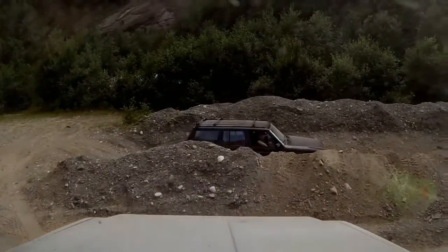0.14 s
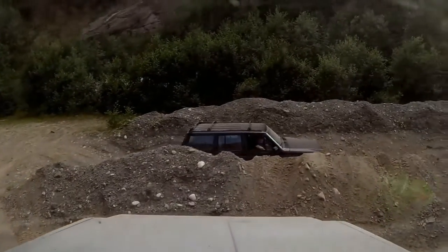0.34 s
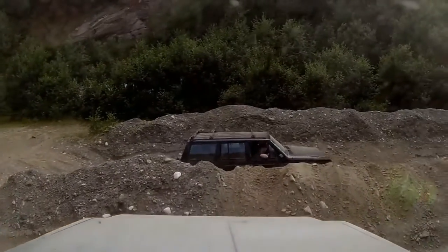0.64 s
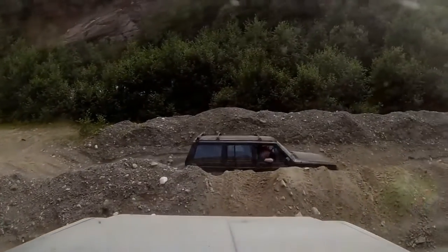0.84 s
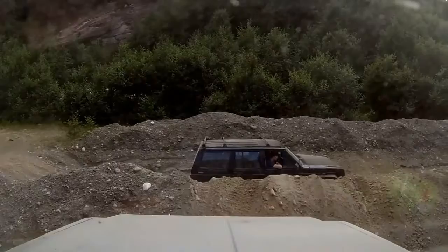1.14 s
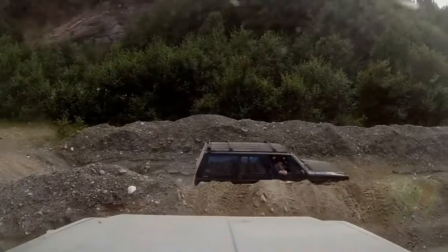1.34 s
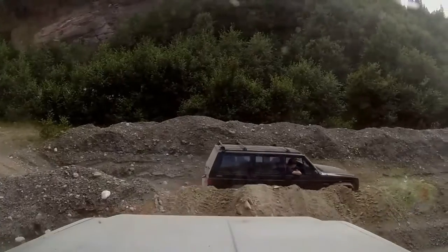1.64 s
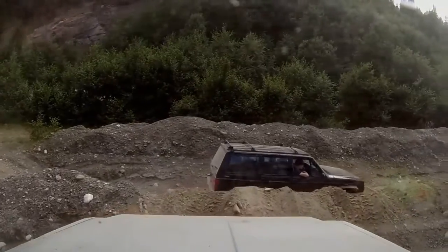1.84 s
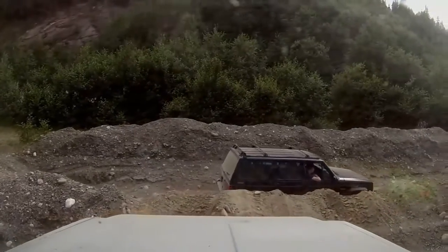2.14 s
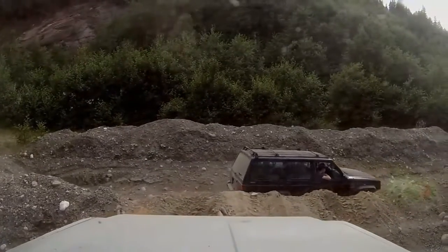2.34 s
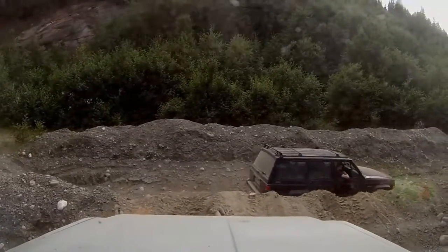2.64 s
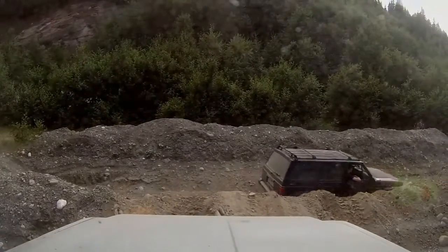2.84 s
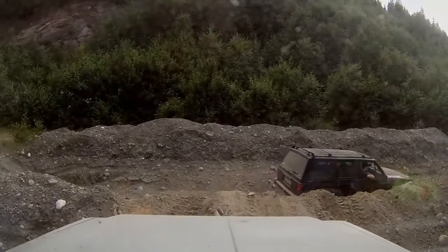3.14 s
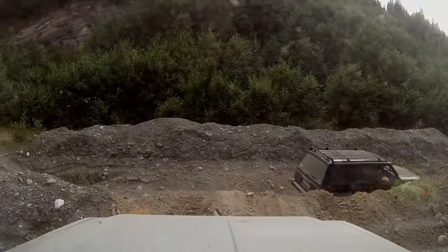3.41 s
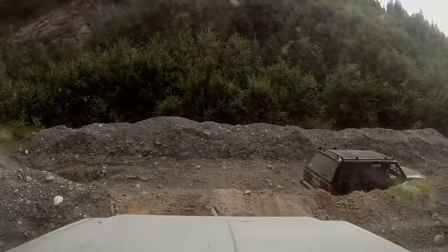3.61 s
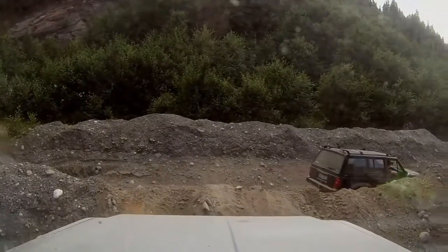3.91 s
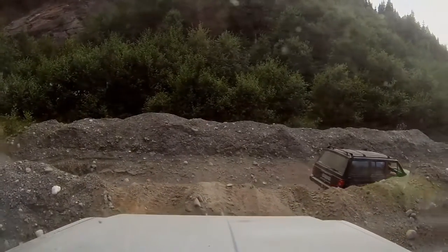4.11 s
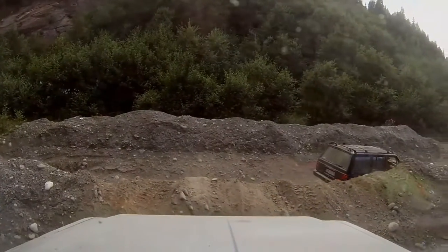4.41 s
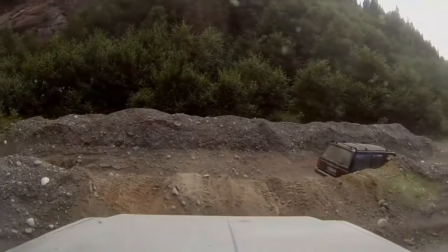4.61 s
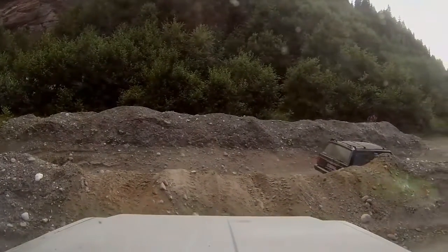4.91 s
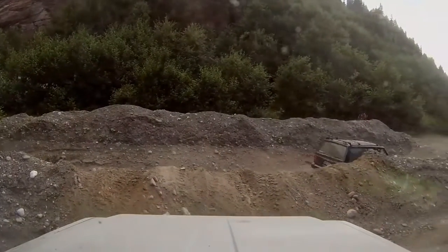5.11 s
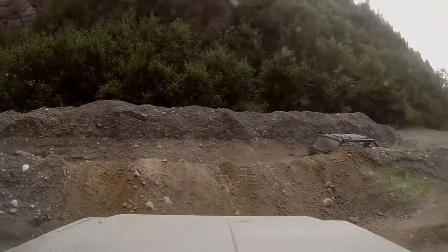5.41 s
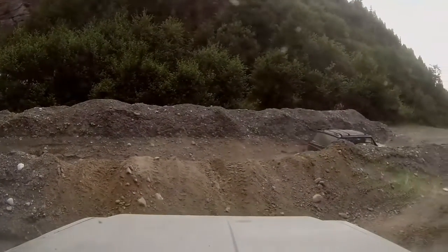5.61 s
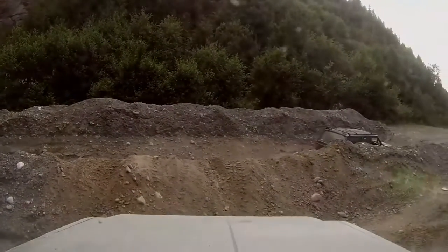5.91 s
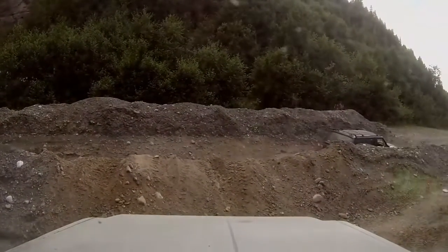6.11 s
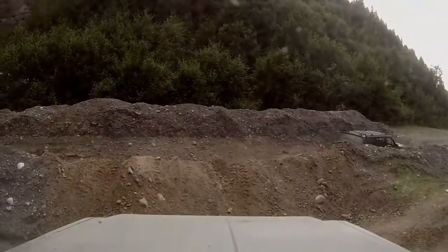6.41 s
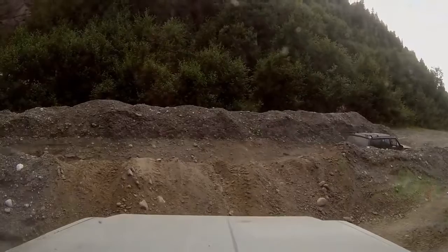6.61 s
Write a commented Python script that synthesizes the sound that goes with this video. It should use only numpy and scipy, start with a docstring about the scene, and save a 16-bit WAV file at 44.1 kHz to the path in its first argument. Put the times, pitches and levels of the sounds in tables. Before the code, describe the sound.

Inside an old four-wheel-drive crawling over gravel, a low engine booms and throbs while bumps set off knocks and metal rattles.

```python
"""Inside an old four-wheel-drive crawling over gravel, heard by a small camera in a closed housing.
The cabin booms on two low engine tones over road rumble. Bumps rattle a loose steel latch and knock
the camera mount, both echoing briefly; they also make joints squeak and drag something along the body.
The microphone hisses faintly, and the camera turns its gain down after loud peaks."""
import sys
import numpy as np
from scipy import signal
from scipy.fft import rfft, irfft, next_fast_len
from scipy.io import wavfile
from scipy.ndimage import uniform_filter1d, map_coordinates

SR = 44100
rng = np.random.default_rng(int(sys.argv[2]) if len(sys.argv) > 2 else 0)


def store_wav(level_fs):
    """Save 16-bit WAV to argv[1]."""
    pcm = np.round(np.clip(np.atleast_2d(level_fs), -1, 1) * 32767)
    wavfile.write(sys.argv[1], SR, pcm.T.astype(np.int16))


N = 297675

# Low and high resonances rung by both latch and mount: f/Hz, width/Hz, gain/dB
THUD_MODES = [(205, 232, 1), (418, 123, -9), (842, 82, -7.5), (1247, 130, -13.5)]
EDGE_MODES = [(4390, 216, -0.5), (6120, 550, -5), (7300, 1200, -26), (11500, 3000, -29)]


def amp(db):
    return 10 ** (np.asarray(db) / 20)


def unit(x):
    return x / np.sqrt(np.mean(x ** 2) + 1e-20)


def curves(rows):
    """Each column after the time, interpolated per sample."""
    times, *columns = np.transpose(rows)
    return [np.interp(np.arange(N) / SR, times, column) for column in columns]


def wobble(rate_hz):
    """Smooth random curve, rate_hz knots a second."""
    knots = rng.standard_normal(int(N * rate_hz / SR) + 4)
    return map_coordinates(knots, [np.arange(N) * rate_hz / SR])


def filtered(x, response):
    """x through a complex frequency response."""
    size = next_fast_len(N + SR // 2)
    return irfft(rfft(x, size) * response(np.fft.rfftfreq(size, 1 / SR)), size)[..., :N]


def rush(spectrum, flutter_db, rate_hz):
    """Fluttering coloured noise, rms 1."""
    hz, db = np.transpose(spectrum)
    noise = rng.standard_normal(N) * amp(flutter_db * wobble(rate_hz))
    return unit(filtered(noise, lambda f: amp(np.interp(np.log(f + 1), np.log(hz + 1), db))))


def resonances(f, modes, soft_hz):
    """Response of modes of alternating sign; the give of the contact cuts above soft_hz."""
    ring = sum((-1) ** k * amp(db) * 1j * f * width_hz / (hz * hz - f * f + 1j * f * width_hz)
               for k, (hz, width_hz, db) in enumerate(modes))
    return ring / (1 + 1j * f / soft_hz) ** 4


def struck(times, forces, modes, soft_hz, detune=.015, uneven_db=1.5):
    """Short forces, one row per blow, ring modes that shift slightly each time."""
    out, size = np.zeros(N + SR), 4096
    f = np.fft.rfftfreq(size, 1 / SR)
    hz, width_hz, db = np.transpose(modes)
    for start_s, force in zip(times, forces):
        shift, swing = rng.standard_normal((2, len(modes)))
        shifted = zip(hz * (1 + detune * shift), width_hz, db + uneven_db * swing)
        out[round(start_s * SR):][:size] += irfft(rfft(force, size) * resonances(f, shifted, soft_hz))
    return out[:N]


def wavering(hz, db, waver_hz=0.6, waver_db=1.1):
    """Phase and amplitude of an unsteady tone."""
    phase = 2 * np.pi * np.cumsum(hz + waver_hz * wobble(8.2)) / SR
    return phase, np.sqrt(2) * amp(db + waver_db * wobble(9))


def engine_boom(throb_hz=6.1, throb_ref_s=4.73):
    """Two engine tones with weak octaves boom in the cabin; the lower throbs. Gives sound and phases."""
    low_tone = [(0, 42.2, -28, 3), (.55, 43.1, -29, 5), (.75, 43.9, -31, 3), (.92, 43.5, -32, 10.5),
                (1.02, 43.37, -24, 0), (1.35, 44.8, -44.5, -9), (1.8, 45.27, -33.5, -11.5),
                (2.2, 46.72, -37, 16), (2.4, 43.57, -28.5, 2.5), (2.7, 41.76, -20.5, 0),
                (2.87, 44.3, -58, -4), (3.25, 49.74, -19, -1.5), (3.4, 46.9, -33, 10),
                (3.52, 44.9, -20, -2.5), (3.63, 50.4, -34, -8), (3.76, 51.06, -14, 0.5),
                (3.88, 48.4, -47, -6), (3.93, 48.94, -13.5, 5.5), (4.2, 50.55, -17, 2.5),
                (4.36, 50.4, -15, -2.5), (4.42, 47.9, -30, 6), (4.52, 51.56, -21, 2),
                (4.62, 48.34, -35, -12), (4.74, 52, -19, 7.5), (5.1, 51.06, -27.5, 0),
                (5.5, 49.43, -17, -4), (5.85, 49.32, -30, 9.5), (6.0, 42.95, -34.5, 4.5),
                (6.32, 44.55, -26.5, 7.5), (6.42, 46.57, -32, 2), (6.75, 41.1, -25.5, 1)]  # t/s, f/Hz, level/dB, signed throb depth/dB
    high_tone = [(0, 63.44, -33.5), (.44, 62.6, -25), (.68, 64.9, -31), (.82, 59.83, -34),
                 (.94, 62.88, -28), (1.44, 62.53, -30.5), (1.54, 63.2, -25.5), (2.27, 60.6, -27.5),
                 (2.63, 64.15, -37.5), (2.89, 62.8, -25.5), (3.0, 61, -31), (3.2, 61.99, -21.5),
                 (3.33, 60.9, -16.5), (3.42, 59, -32.5), (3.78, 61.57, -21), (3.87, 64.59, -43),
                 (4.41, 69.58, -54), (4.69, 68.68, -30.5), (5.37, 64.98, -31), (5.67, 66, -41),
                 (5.95, 65.28, -29.5), (6.1, 64.7, -30), (6.2, 58.24, -29.5), (6.37, 56.1, -25.5),
                 (6.46, 58.27, -41), (6.68, 58.3, -20.5), (6.75, 58.84, -34)]  # t/s, f/Hz, level/dB
    low_hz, low_db, throb_db = curves(low_tone)
    throb = np.cos(2 * np.pi * throb_hz * (np.arange(N) / SR - throb_ref_s))
    low_phase, low_amp = wavering(low_hz, low_db + throb_db * throb)
    high_phase, high_amp = wavering(*curves(high_tone))
    low = low_amp * (np.sin(low_phase) + (0.013 + 0.34 * low_amp) * np.cos(2 * low_phase))
    high = high_amp * (np.sin(high_phase) + 0.07 * np.cos(2 * high_phase))
    return low + high, low_phase, high_phase


def road(boom_phase, gravel_follows=0.87, gravel_rise_db_per_s=0.07):
    """Rumble, noise pressed out by each swing of the shaken body, and gravel following its swells."""
    swells = [(0, -30, -43.5), (.12, -38, -53.5), (1.35, -41.5, -55), (1.5, -41.5, -48.5), (1.68, -37, -49),
              (1.82, -42.5, -54.5), (2.9, -41, -54.5), (3.1, -28, -49), (3.2, -24.5, -42),
              (3.36, -39, -52.5), (3.6, -39, -51.5), (3.86, -26, -46), (4.1, -34, -43),
              (4.28, -27.5, -45.5), (4.5, -38.5, -52), (5.2, -37, -51), (5.77, -38.5, -51.5),
              (5.87, -32, -47.5), (5.97, -42.5, -55), (6.35, -32, -52), (6.75, -38.5, -54)]  # t/s, rumble rel. level/dB, body rel. level/dB
    # Noise spectra: f/Hz, rel. density/dB
    rumble_spectrum = [(14, -19), (26, -14.5), (42, 2.5), (70, 0.5), (108, -6.5), (130, -14), (160, -16.5),
                       (220, -26.5), (300, -75.5), (400, -120)]
    body_spectrum = [(130, -6.5), (210, 1), (290, 3.5), (350, -3.5), (440, -1.5), (600, -6), (850, -6.5),
                     (1050, -17), (1400, -17.5), (2200, -61.5), (3500, -120)]
    gravel_spectrum = [(600, -16), (1050, -14.5), (1250, -6.5), (1700, -6), (2150, -9), (2700, -11.5),
                       (3450, -13.5), (3900, -17.5), (5000, -24), (7000, -30), (9000, -51), (11000, -120)]
    t = np.arange(N) / SR
    rumble_db, body_db = curves(swells)
    gravel_db = -57 + gravel_follows * (body_db - body_db.mean()) + gravel_rise_db_per_s * (t - t.mean())
    shake = 1 + 0.2 * np.sin(boom_phase)
    rumble = amp(rumble_db + 6.5) * rush(rumble_spectrum, flutter_db=3.5, rate_hz=5.4)
    body = amp(body_db + 0.5) * shake * rush(body_spectrum, flutter_db=2.5, rate_hz=58)
    gravel = amp(gravel_db) * rush(gravel_spectrum, flutter_db=2.5, rate_hz=89)
    return rumble + body + gravel


def hiss_and_band():
    """Steady microphone hiss, plus a separate faint, constant, quickly fluttering band of noise near 10.7 kHz."""
    # Noise spectra: f/Hz, rel. density/dB
    hiss_spectrum = [(3000, -36), (5000, -5), (9500, -5), (12000, -9.5), (13200, -14.5), (15000, -28.5),
                     (16000, -61)]
    band_spectrum = [(9800, -29), (10700, 2.5), (11700, -34)]
    hiss = amp(-74) * rush(hiss_spectrum, flutter_db=0.3, rate_hz=3.1)
    return hiss + amp(-86) * rush(band_spectrum, flutter_db=4, rate_hz=45)


def latch(dull_hz=2380):
    """Short steel contacts; weaker taps touch longer and sound duller. The frame thuds and cracks."""
    blows = [(0.003, -23.5), (0.048, -30), (0.1412, -26), (0.1782, -27.5), (1.723, -20), (3.2395, -7),
             (3.26, -22), (3.268, -27), (3.279, -29), (3.3252, -33), (3.8045, -14.5), (3.8188, -25.5),
             (3.8514, -27.5), (3.872, -22), (3.9227, -28.5), (3.9286, -34), (3.936, -23), (3.944, -30),
             (3.9508, -35), (3.9621, -21), (3.98, -13.5), (4.0152, -43), (4.024, -35), (4.0345, -36.5),
             (4.0434, -32.5), (4.064, -40), (4.0916, -19), (4.1031, -29), (4.1131, -29), (4.1258, -34),
             (4.1353, -28.5), (4.151, -31.5), (4.1581, -27.5), (4.1718, -30), (4.1856, -46), (4.205, -9.5),
             (4.2148, -35), (4.2235, -37), (4.2324, -28.5), (4.2449, -34), (4.3003, -25), (4.3085, -26),
             (4.3176, -28.5), (4.33, -26), (4.337, -24.5), (4.3485, -26), (4.357, -26), (4.3698, -27),
             (4.3808, -35), (4.4066, -28), (4.4569, -34), (5.7163, -29.5)]  # t/s, rel. level/dB
    # Latch resonances, the high ones woken by hard blows: f/Hz, width/Hz, gain/dB
    low_modes = [(830, 540, -16), (1430, 210, -2), (1750, 290, -9), (2108, 98, -1)]
    high_modes = [(2440, 123, -4), (3960, 60, -16), (4580, 77, -14), (5750, 110, -32)]
    times, db = np.transpose(blows)
    db, t = db[:, None], np.arange(128) / SR
    touch_s = 2.3e-5 * amp(-.4 * db)
    roughness = 1 + .08 * rng.standard_normal((len(blows), len(t)))
    pulse = roughness * np.exp(-((t - .0003) / touch_s) ** 2 / 2) / (touch_s * SR)
    force = amp(db + 32) * pulse
    hard_force = amp(2 * db + 38.5) * pulse  # square law
    thud = amp(-12.5) * struck(times, force, THUD_MODES[:2], soft_hz=2450)
    crack = amp(-41) * struck(times, force, EDGE_MODES[1:], soft_hz=16000)
    ring = amp(-2) * struck(times, force, low_modes, soft_hz=9000)
    ring = filtered(ring, lambda f: 1 / (1 - (f / dull_hz) ** 2 + 0.9j * f / dull_hz))
    return thud + crack + ring + struck(times, hard_force, high_modes, soft_hz=7100)


def camera_mount(contact_s=0.004, judder_start_s=1.571, judder_gap_s=0.028):
    """Each jolt is a gritty contact ringing the housing, with one dull blow in its middle."""
    # Jolts: t/s, rel. level/dB, then offsets/dB for deep thud, hollow knock, low ring, edge, ping
    jolts = [(0.0161, -35.5, -11, -15, -9, -7, -9), (0.0509, -26.5, -27, -15, -18, -11, -16),
             (0.066, -29.5, -27, -23, -10, -10, -18), (0.1147, -29, -17, -8, -15, -6, -8),
             (0.1358, -33, 6.5, -1, -9, -7, -6), (0.2869, -42.5, -15, -2, -2.5, -10, -15),
             (0.622, -30.5, 1, -4, -1, -8, -1.5), (0.6401, -29.5, 10, 18, 2, -9, -7),
             (0.7421, -40, -3, -4, -2, -11, -5.5), (2.185, -19, 7.5, 10.5, 2.5, -9.5, -17),
             (2.2066, -23.5, -15, -27, -14, -5, -15), (2.2651, -28.5, -9, -12, -17, -15, -12),
             (2.2812, -20, -12, -12, -3.5, -6.5, -8.5), (2.4473, -45.5, -10, -4, -4, -11, -9),
             (2.4945, -44.5, 13, 4, -4, -9, -10), (2.589, -41.5, -4, 0, 1.5, 0.5, -4),
             (3.217, -46, -10, -7, -3, -11.5, -9), (3.2254, -39, 4, 7, 2, -15, -23),
             (3.4853, -36, -7, -10, -4.5, -14, -8.5), (3.78, -50, -5, -5, 8, -14, -15),
             (3.8066, -22, 5, 1.5, -2, -9.5, -12), (3.8759, -29, 7, -8, 0, 5.5, 0.5),
             (3.9085, -18.5, 5, 3.5, 2, -9, -6.5), (4.349, -39, -15, 3, -11, -7, -4),
             (4.6866, -15, 6, -1, 0.5, -1.5, -6), (4.7315, -36.5, 11, -1, -2, -6, -7),
             (4.8123, -41.5, -7, -6, -5, -10, -14), (4.963, -37.5, 3, -1, -2, -10, -8),
             (5.2218, -28.5, 1, -8, -2.5, -2.5, -9), (5.285, -43, 9.5, 7, 4, -13, -11),
             (5.5591, -42.5, -10, -7, 0, -16, -11), (6.2735, -41.5, -17, -17, -12, -18, -10),
             (6.3405, -43.5, 18.5, 6, -6, -7, -4), (6.4699, -48, 24.5, -7, 3, 0, -11),
             (6.5074, -30, -13, 5.5, -7, -0.5, -6.5), (6.612, -44.5, 10, -3, -1, -5, -8),
             (6.66, -43, -8, 0, -3, -10, -5.5), (6.6828, -44, -16, -8, 0, -9, -6)]
    tick = (-51, -11, -16, 3.5, -4.5, -16)  # faint jolt at random times: as above, without t/s
    housing_modes = [(1600, 220, -3), (1988, 190, -6.5), (2480, 230, -2.5), (2950, 300, -7),
                     (3500, 350, -11.5)]  # f/Hz, width/Hz, gain/dB
    judder = [(judder_start_s + k * judder_gap_s, -58.5, 0, 29, 4, -15, -17) for k in range(5)]
    ticks = [(when * N / SR, tick[0] + 3.5 * (size - .5), *tick[1:]) for when, size in rng.random((8, 2))]
    columns = np.transpose(jolts + judder + ticks)
    times, t = columns[0], np.arange(512) / SR
    db, deep_db, hollow_db, low_db, edge_db, ping_db = columns[1:, :, None]
    contact = np.sin(np.pi * np.clip(t / contact_s, 0, 1))
    grit = amp(db + 21.5) * rng.standard_normal((len(times), len(t))) * contact
    mid_s = times + contact_s / 2
    hollow_force = amp(db + hollow_db + 39.5)
    knock = struck(mid_s, hollow_force, THUD_MODES[1:2], soft_hz=2350)
    knock += struck(mid_s, hollow_force, THUD_MODES[2:], soft_hz=2360)
    thud = struck(mid_s, -amp(db + deep_db + 32.5), THUD_MODES[:1], soft_hz=938)
    ring = struck(times, amp(low_db) * grit, housing_modes[:2], soft_hz=5680)
    ring += struck(times, grit, housing_modes[2:], soft_hz=5500)
    ping = struck(times, amp(ping_db - 3.5) * grit, EDGE_MODES[:1], soft_hz=16200)
    edge = struck(times, amp(edge_db - 8) * grit, EDGE_MODES[1:], soft_hz=15600)
    return knock + thud + ring + ping + edge


def cabin_echo(x, rt60_s=0.031):
    """Short, dull reflections in the cabin."""
    t = np.arange(SR // 5) / SR
    dull_noise = uniform_filter1d(rng.standard_normal(len(t)), size=10)
    tail = dull_noise * amp(-60 * t / rt60_s) * (t > .003)
    return signal.fftconvolve(x, tail / np.linalg.norm(tail))[:N]


def brushes():
    """Brief noisy strokes against the body."""
    strokes = [(1.032, 0.036, -63), (1.674, 0.044, -59.5), (5.086, 0.022, -54), (5.823, 0.091, -60),
               (6.279, 0.051, -62), (6.322, 0.065, -55.5)]  # t/s, length/s, level/dB
    spectrum = [(1500, -19), (3000, -5), (4500, -8), (6300, -5), (7500, -18), (11000, -25), (15000, -43)]  # f/Hz, rel. density/dB
    t = np.arange(N) / SR
    envelope = sum(amp(db) * np.sin(np.pi * np.clip((t - start_s) / length_s, 0, 1))
                   for start_s, length_s, db in strokes)
    return envelope * rush(spectrum, flutter_db=-3, rate_hz=97)


def squeaks(octave_db=-21.5):
    """Rubbing joints squeak and groan: shaky gliding tones with a weak octave."""
    rubs = [(1.384, 0.071, 2842, 2890, -62, .3), (1.40, 0.45, 430, 425, -51.5, .2),
            (1.429, .26, 290, 318, -50, .2), (1.534, 0.15, 3180, 3220, -55, 0.11),
            (2.504, 0.079, 842, 789, -53, .1), (2.547, 0.022, 2820, 2720, -56, .2),
            (3.624, 0.22, 2754, 2839, -56.5, .25), (6.271, 0.04, 2130, 2400, -49, 0.9),
            (6.483, 0.062, 7800, 5900, -55, .55), (6.512, 0.03, 6400, 5550, -52.5, .75),
            (6.53, 0.052, 5700, 5120, -55, .5), (6.403, 0.65, 2202, 2120, -58, 0.19)]  # t/s, length/s, start f/Hz, end f/Hz, level/dB, phase shake/rad
    out = np.zeros(N + SR)
    flutter, shiver = np.pad(wobble(50), (0, SR)), np.pad(wobble(700), (0, SR))
    for start_s, length_s, start_hz, end_hz, db, shake_rad in rubs:
        start, count = round(start_s * SR), round(length_s * SR)
        span = slice(start, start + count)
        progress = np.arange(count) / (length_s * SR)
        hz = start_hz + (end_hz - start_hz) * progress
        phase = 2 * np.pi * np.cumsum(hz) / SR + shake_rad * shiver[span]
        envelope = amp(db + (2.8 + 3.7 * shake_rad) * flutter[span]) * np.sqrt(np.sin(np.pi * progress))
        out[span] += envelope * (np.sin(phase) + amp(octave_db) * np.sin(2 * phase))
    return out[:N]


def drag(boom_phase, start_s=2.95, attack_s=0.091, hold_s=0.12, release_s=0.081, deepen_per_s=2.4):
    """A grainy scrape rings the body panels, pressed harder once per boom cycle, increasingly so."""
    panel_modes = [(1490, 300, 1), (2010, 220, -3.5), (2380, 200, 0), (2820, 190, -0.5), (3380, 200, 1),
                   (3780, 220, -7.5), (4020, 300, -15), (4600, 300, -5), (4850, 350, -8.5), (6250, 450, -9),
                   (7000, 500, -11.5), (9100, 1500, -22)]  # f/Hz, width/Hz, gain/dB
    low_spectrum = [(170, -15.5), (280, 1), (500, -23), (800, -16), (1050, -26), (1500, -67), (3000, -120)]  # low part of the scrape: f/Hz, rel. density/dB
    t = np.arange(N) / SR
    stroke = np.interp(t, start_s + np.cumsum([0, attack_s, hold_s, release_s]), [0, 1, 1, 0])
    depth = np.clip(deepen_per_s * (t - start_s), 0, 1)
    pressure = np.exp(depth * np.sin(boom_phase) - depth ** 2 / 2)
    grains = rng.standard_normal(N) * amp(1.5 * wobble(400))
    ring = amp(-2) * unit(filtered(grains, lambda f: resonances(f, panel_modes, soft_hz=11000)))
    return amp(-39) * stroke * (pressure * ring + rush(low_spectrum, flutter_db=2, rate_hz=160))


def gain_control(x, threshold_db=-3, cut_db_per_db=1.34, lag_s=0.019, recover_db_per_s=18.5):
    """A loud peak turns the gain down a moment later; it creeps back up."""
    ramp_db = recover_db_per_s * np.arange(N) / SR
    lag = round(lag_s * SR) + 1
    over_db = np.maximum(20 * np.log10(np.abs(x[0]) + 1e-9) - threshold_db, 0)
    cut_db = np.maximum.accumulate(cut_db_per_db * over_db + ramp_db) - ramp_db
    return x * amp(-uniform_filter1d(np.pad(cut_db, (lag, 0))[:N], size=lag))


def scene():
    """Mono mix; the low boom shakes the body, the high boom presses the scrape."""
    hits = latch() + camera_mount()
    boom, low_phase, high_phase = engine_boom()
    cabin = boom + road(low_phase) + drag(high_phase)
    return (cabin + hits + amp(-20.5) * cabin_echo(hits) + squeaks() + hiss_and_band() + brushes())[None]


def record(dry):
    """Camera: microphone bass loss, gain control, soft clipping, band limit."""
    bass_hz, ceiling, top_hz = 22, .98, 15800
    heard = gain_control(filtered(dry, lambda f: (1j * f / (bass_hz + 1j * f)) ** 2))
    rounded = heard / (1 + np.abs(heard / ceiling) ** 6) ** (1 / 6)
    return filtered(rounded, lambda f: f < top_hz)


dry = scene()
out = record(dry)
store_wav(out)
```